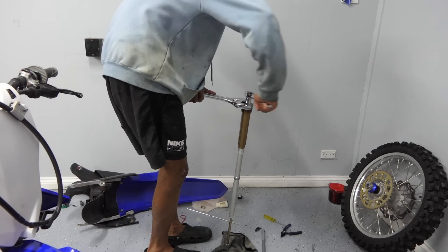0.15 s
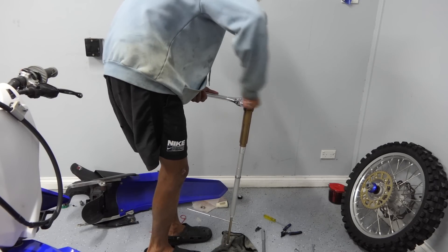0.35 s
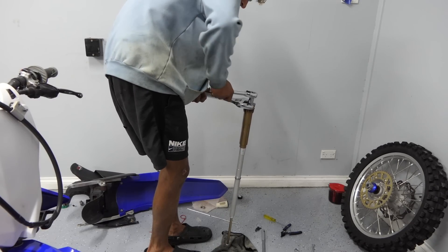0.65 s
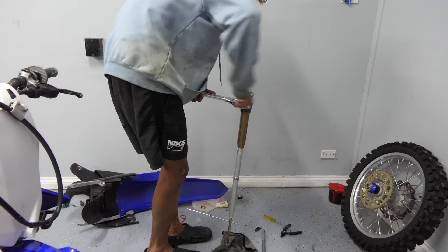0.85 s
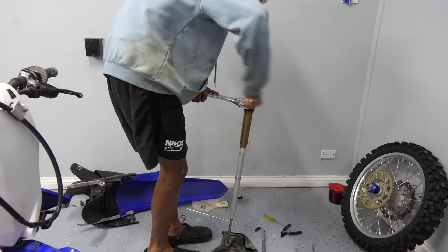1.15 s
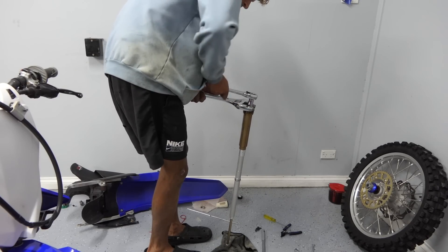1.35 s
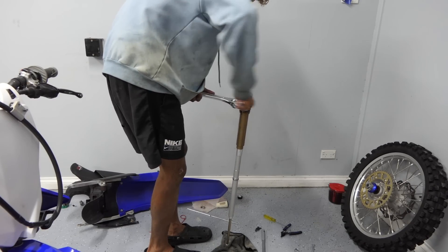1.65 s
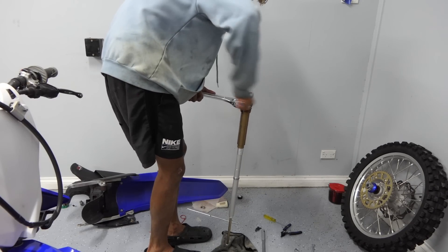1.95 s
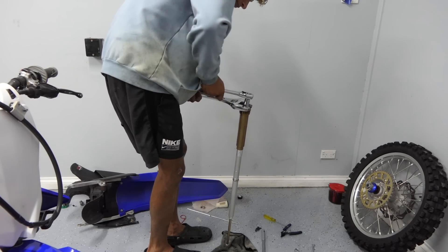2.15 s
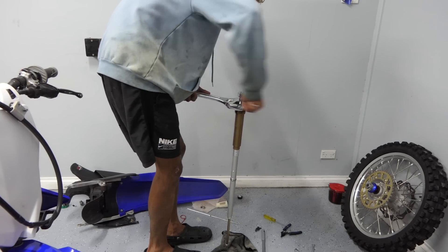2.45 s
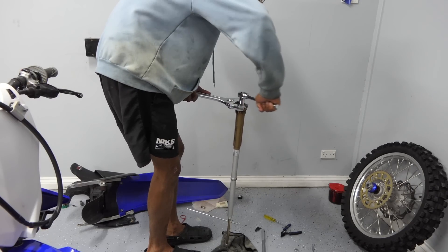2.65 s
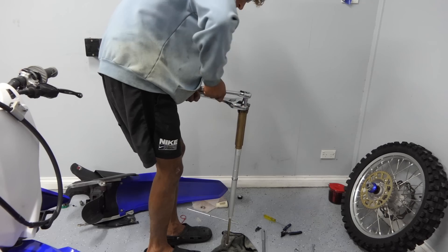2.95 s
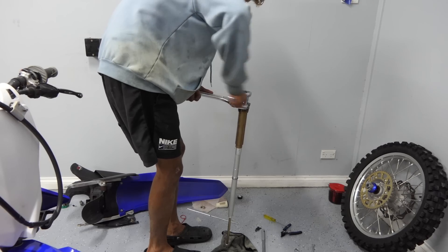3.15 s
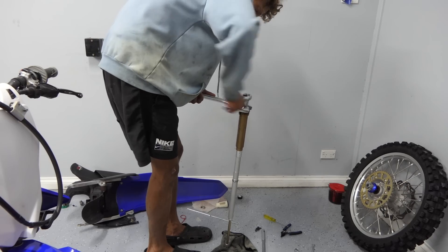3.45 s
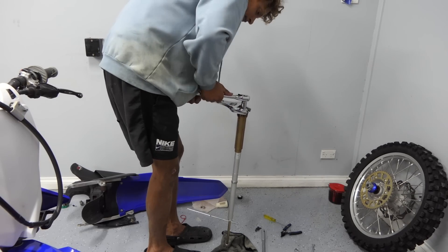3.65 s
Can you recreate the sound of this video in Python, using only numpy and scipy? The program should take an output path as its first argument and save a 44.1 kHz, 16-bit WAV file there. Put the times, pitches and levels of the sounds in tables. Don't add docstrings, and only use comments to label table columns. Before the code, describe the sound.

Ratchet handle swinging back five times, each a rapid bright clicking run, in a bare echoing room.

```python
import sys
import numpy as np
from scipy import signal
from scipy.fft import rfft, irfft, next_fast_len
from scipy.io import wavfile
from scipy.ndimage import map_coordinates

SR = 44100
rng = np.random.default_rng(int(sys.argv[2]) if len(sys.argv) > 2 else 0)


def gain_from_db(level_db):
    decades = np.asarray(level_db, float) / 20
    return 10 ** decades


def dump_mix(stems):
    frames = np.atleast_2d(stems).T
    limited = np.clip(frames, -1, 1)
    pcm = np.round(limited * 32767).astype(np.int16)
    wavfile.write(sys.argv[1], SR, pcm)


N = 167580


def unit(x):
    return x / np.sqrt(np.mean(x ** 2) + 1e-20)


def along(points, hz):
    f, v = np.transpose(points)
    return np.interp(np.log(hz + 1), np.log(f + 1), v)


def coloured(x, db_of_hz):
    n = x.shape[-1]
    m = next_fast_len(n + 4096)
    gain = gain_from_db(db_of_hz(np.fft.rfftfreq(m, 1 / SR)))
    cepstrum = irfft(np.log(gain + 1e-6), m)
    cepstrum[1:m // 2] *= 2
    cepstrum[m // 2 + 1:] = 0
    return irfft(rfft(x, m) * np.exp(rfft(cepstrum)), m)[..., :n]


def wobble(rate):
    return map_coordinates(rng.standard_normal(100), [np.arange(N) * rate / SR])


def add(track, s, sound):
    part = track[round(s * SR):][:len(sound)]
    part += sound[:len(part)]


def ratchet():
    # (time [s], teeth passed)
    angles = [
        [(.3485, 0), (.358, 1), (.3763, 3), (.3914, 4), (.4209, 7), (.452, 10), (.479, 12), (.5088, 14),
         (.5329, 15)],
        [(1.1507, 0), (1.181, 3), (1.2288, 8), (1.251, 10), (1.275, 12), (1.290, 13), (1.3085, 14),
         (1.3348, 15)],
        [(1.9394, 0), (1.954, 1), (1.9903, 5), (2.0112, 7), (2.0223, 8), (2.035, 9), (2.0725, 12), (2.0907, 13),
         (2.112, 14)],
        [(2.7352, 0), (2.7577, 2), (2.7998, 6), (2.8501, 11), (2.873, 13), (2.8876, 14), (2.904, 15),
         (2.9249, 16), (2.9506, 17)],
        [(3.2996, 0), (3.3162, 1), (3.3537, 4), (3.4051, 9), (3.4461, 13), (3.5192, 20), (3.562, 23),
         (3.584, 24), (3.615, 25)],
    ]
    pawl_db = [
        [-21, -20.5, -18, -17.5, -19.5, -20, -19.5, -17, -22.5],
        [-16.5, -18.5, -20.5, -19.5, -18, -20.5, -18, -20.5],
        [-18.5, -20.5, -19, -16, -25, -16, -21.5, -18.5, -26],
        [-20, -19.5, -17, -20.5, -21, -16.5, -23, -15.5, -21],
        [-20.5, -21.5, -21, -21.5, -20.5, -20.5, -16.5, -27, -26.5],
    ]
    grip_pitch = [(0.92, .995, 1.004, 1.001, 1.008, 1.003), (1.022, 1, .997, 1.001, .997, .998),
                  (1.05, .99, .998, .99, .99, 1.4), (0.974, .99, .995, .99, .99, 1.2),
                  (1.01, 1.026, 1.001, 1.001, .999, .99)]
    grip_db = [(-3, -1.5, 0.3, -1.5, -2, -3), (-7, -5, -2.5, 1, -0.8, -4.5), (-30, -3, -2.5, -4, 0, -5),
               (7.8, -3, -1.5, 1.5, -3.5, -7), (-3.5, 0.5, 1.3, 3, 2, -2)]
    turn_db = [(.3, -3.5, 6, -8, 6, .3), (.3, 1, 7.5, -5, 2, .3), (.3, 3.5, -.6, -3, -0.5, .3),
               (.3, -4, .3, -6, 1, .3), (2.5, -8, -7.5, -11, -3, .3)]
    # (start [dB], middle [dB], end [dB])
    facing_db = [(-14, -3, -9), (-10, -8, -3), (-17, -14, -8), (-19, -12, -2), (-5, -6, -5.5)]
    return sum(swing(*rows) for rows in zip(angles, pawl_db, grip_pitch, grip_db, turn_db, facing_db))


def swing(angles, pawl_db, grip_pitch, grip_db, turn_db, facing_db):
    # (frequency [Hz], level [dB], t60 [s])
    head = [(1350, -15, 0.018), (2290, -0.5, 0.0082), (2535, -8.5, 0.035), (3186, 6.5, 0.017),
            (3965, -5, 0.013), (5550, -9.5, 0.022), (6096, 8, 0.0058), (6270, 5.5, 0.018), (8680, 1, 0.011),
            (9100, -1.5, 0.026), (9807, 11, 0.0094), (10055, 5.5, 0.022), (11870, -4, 0.013),
            (11580, 8, 0.016)]
    # (frequency [Hz], level [dB])
    snap = [(300, -21), (700, -16), (1300, -8.5), (2500, -4.5), (4700, -8), (7500, -6), (11000, -6),
            (15500, -13.5)]
    # (frequency [Hz], level [dB])
    edge = [(4000, -40), (7500, -13), (11000, -7), (14000, -6), (16000, -9)]
    grip_hz = (1500, 3200, 6300, 9000, 10000, 12000)
    ring_db, ring_floor_hz, ring_attack_s = -11, 845, 0.00029
    snap_db, snap_t60, tick_db = 10.5, 0.01, -4.5
    mode_scatter_db, tooth_scatter_db, snap_scatter_db = 2, .5, 1
    detune, tooth_jitter_s = .007, .0003

    s, teeth = np.transpose(angles)
    tooth = np.arange(teeth[-1] + 1)
    progress = tooth / tooth[-1]
    t = np.arange(SR // 16) / SR
    mode_luck, pitch_luck = rng.standard_normal((2, len(tooth), len(head), 1))
    snap_luck, tooth_luck, time_luck = rng.standard_normal((3, len(tooth)))

    hz, mode_db, t60 = np.transpose(head)[..., None]
    hz = hz * np.interp(hz, grip_hz, grip_pitch)
    mode_db = mode_db + np.interp(hz, grip_hz, grip_db)
    mode_db = mode_db + np.interp(hz, grip_hz, turn_db) * (progress - .5)[:, None, None]
    decay = gain_from_db(mode_db + mode_scatter_db * mode_luck - 60 * t / t60)
    modes = decay * np.sin(2 * np.pi * hz * (1 + detune * pitch_luck) * t)
    ring = gain_from_db(ring_db) * modes.sum(1) * (1 - np.exp(-t / ring_attack_s))

    chatter = gain_from_db(-60 * t / snap_t60) * rng.standard_normal((len(tooth), len(t)))
    chatter = chatter / np.linalg.norm(chatter, axis=1)[:, None]
    snap_gain = 3 * gain_from_db(snap_db + snap_scatter_db * snap_luck)[:, None]
    crack = snap_gain * (chatter + gain_from_db(tick_db) * (t == 0))

    no_bass = lambda f: -10 * np.log10(1 + (ring_floor_hz / (f + 1)) ** 8)
    clicks = coloured(ring, no_bass) + coloured(crack, lambda f: along(snap, f))
    facing = gain_from_db(np.interp(progress, (0, .5, 1), facing_db))[:, None]
    clicks = clicks + facing * coloured(crack, lambda f: along(edge, f))
    strength_db = np.interp(tooth, teeth, pawl_db) + tooth_scatter_db * tooth_luck
    times = np.interp(tooth, teeth, s) + tooth_jitter_s * time_luck
    return workshop(times, clicks * gain_from_db(strength_db)[:, None])


def knocks():
    knock_s = [.2877, .62, 1.0824, 1.1095, 1.122, 1.415, 1.821, 1.8816, 2.205, 2.632, 2.6684, 3.0325, 3.233,
               3.265, 3.7105, 3.7172, 3.0326]
    # (level [dB], centre [Hz], spread [octaves], rattle length [s])
    landings = [(-19, 3100, 2, 0.0054), (-33.5, 4200, 1.9, 0.0045), (-30, 2300, 1.36, 0.0027),
                (-31, 2700, 3.3, 0.0042), (-37, 2000, 3, 0.0036), (-31.5, 5000, 2.5, 0.0078),
                (-47, 3000, 0.85, 0.0079), (-29, 2600, 2.7, 0.0047), (-35.5, 2200, 2.8, 0.018),
                (-51.5, 2300, 1.3, 0.0045), (-34.5, 5700, 3.1, 0.0089), (-22, 3500, 4.3, 0.0013),
                (-41, 1900, 1.2, 0.005), (-43.5, 1900, 1.3, 0.009), (-28, 1700, 3.9, 0.004),
                (-28.5, 9000, 2.7, 0.0015), (-7, 13600, 0.43, .0005)]
    # (rod [Hz], rod [dB], socket [Hz], socket [dB])
    knock_ring = [(1940, -38, 5070, -26), (1390, -56, 3500, -54), (1530, -56, 3450, -46),
                  (1510, -47, 3260, -47), (1460, -50, 3210, -57), (1390, -46, 1800, -48),
                  (1400, -51, 3200, -60), (1330, -29, 4700, -50), (1380, -36, 9600, -53),
                  (1400, -59, 3000, -60), (1480, -28.5, 3330, -28.5), (1400, -32, 3400, -28),
                  (1340, -42, 2800, -53), (1400, -59, 1300, -59), (1390, -52, 2500, -28),
                  (2230, -48, 4600, -49), (9100, -49, 9400, -41)]
    # (frequency [Hz], level [dB])
    slack = [(250, -23), (700, -4), (1350, 2.5), (2300, 2), (3300, -1), (5200, -5), (8200, -5),
             (11000, -13.5)]
    rattle_per_s, rattle_db = 1070, 2
    strike_db = -4
    ring_t60, ring_attack_s = (.016, .013), .0004

    t, sounds = np.arange(SR // 16) / SR, []
    for (db, centre_hz, octaves, length), ring in zip(landings, knock_ring):
        lumps = np.interp(t * rattle_per_s, np.arange(400), rng.standard_normal(400))
        rattle = gain_from_db(rattle_db * lumps) * np.exp(-(t / length) ** 2) * rng.standard_normal(len(t))
        rattle = rattle / np.linalg.norm(rattle) + gain_from_db(strike_db) * (t == 0)
        rattle = np.sqrt(SR * length) * rattle
        tone = lambda f: along(slack, f) - 6 * (np.log2((f + 1) / centre_hz) / octaves) ** 2
        modes = np.zeros(len(t))
        for hz, ring_db, t60 in zip(ring[::2], ring[1::2], ring_t60):
            modes += gain_from_db(ring_db - 60 * t / t60) * np.sin(2 * np.pi * hz * t)
        sounds.append(gain_from_db(db) * coloured(rattle, tone) + modes * (1 - np.exp(-t / ring_attack_s)))
    return workshop(knock_s, np.array(sounds))


def thumps():
    # (time [s], level [dB], frequency [Hz], t60 [s])
    jolts = [
        (0.291, -46.5, 142, 0.057),
        (.289, -33, 700, 0.023),
    ]
    t = np.arange(SR // 4) / SR
    sounds = [gain_from_db(db - 60 * t / t60) * np.sin(2 * np.pi * hz * t) for s, db, hz, t60 in jolts]
    return workshop([row[0] for row in jolts], np.array(sounds))


def sleeve():
    # (time [s], level [dB], length [s])
    brushes = [
        (0.156, -62, 0.054),
        (0.95, -63, 0.052),
        (1.76, -61, 0.045),
        (2.502, -60.5, 0.062),
    ]
    # (frequency [Hz], level [dB per Hz])
    cloth = [(1500, -16), (4000, -5), (7500, 0), (12000, -4), (16000, -16)]
    t = np.arange(N) / SR
    swell = sum(gain_from_db(db) * np.exp(-((t - s) / length) ** 2) for s, db, length in brushes)
    rustle = unit(coloured(rng.standard_normal(N), lambda f: along(cloth, f)))
    return swell * gain_from_db(1.2 * wobble(22.84)) * rustle


def workshop(times, sounds):
    # (delay [s], level [dB])
    bounces = [
        (.0036, -5),
        (.0066, -6),
        (0.0114, -12),
    ]
    # (frequency [Hz], level [dB])
    early_colour = [(1500, 0), (6000, -2), (14000, -6)]
    # (frequency [Hz], t60 [s])
    room = [(300, 1), (1300, 0.67), (3500, 0.66), (9000, .5), (15000, 0.27)]
    # (frequency [Hz], level [dB])
    room_colour = [(300, 1.5), (1500, 1), (5000, 1), (15000, -1)]
    early_db, early_t60, late_db, wall_gap_s = -1, 0.081, 2, .0028

    gap, dry, out = round(wall_gap_s * SR), np.zeros(N), np.zeros((2, N))
    fade = gain_from_db(-60 * np.arange(SR // 8) / SR / early_t60)
    early = rng.standard_normal((2, len(times), SR // 8)) * fade
    early = coloured(early, lambda f: along(early_colour, f))
    early = gain_from_db(early_db) * early / np.linalg.norm(early, axis=2, keepdims=True)
    early = np.pad(early, ((0, 0), (0, 0), (gap, 0)))
    early[0, :, 0] = 1
    for delay, db in bounces:
        early[0, :, round(delay * SR)] += gain_from_db(db)
    near = signal.fftconvolve(sounds[None], early, axes=2)
    for s, sound, mid, side in zip(times, sounds, *near):
        add(dry, s + wall_gap_s, sound)
        add(out[0], s, mid)
        add(out[1], s, side)

    hz, t, z = signal.stft(rng.standard_normal((2, SR)), SR, nperseg=256)
    tail_db = along(room_colour, hz)[:, None] - 60 * t / along(room, hz)[:, None]
    late = signal.istft(z * gain_from_db(tail_db), SR, nperseg=256)[1][:, :SR]
    late = gain_from_db(late_db) * late / np.linalg.norm(late[0])
    return out + signal.fftconvolve(dry[None], late, axes=1)[:, :N]


def room_tone():
    # (frequency [Hz], level [dB per Hz])
    air = [(13, -19), (22, -27), (55, -6.5), (118, -12), (199, -10.5), (298, -6.5), (470, -4), (600, -11.5),
           (850, -18), (1500, -40), (4000, -57)]
    # (frequency [Hz], level [dB per Hz])
    hiss = [(350, -26), (680, -15.5), (1130, -16), (2500, -21.5), (4500, -26.5), (7500, -24.5),
            (12500, -28), (16000, -33)]
    # (frequency [Hz], level [dB rms])
    hum = [(59.2, -71), (100, -73), (199.2, -64.5), (301.5, -63.5)]
    air_db, hiss_db, hum_waver_db, hum_drift_rad = -53.5, -58, -1.5, 1

    def noise(points):
        return np.array([unit(coloured(rng.standard_normal(N), lambda f: along(points, f))) for _ in "ms"])

    t = np.arange(N) / SR
    bed = gain_from_db(air_db + 0.067 * wobble(4.9)) * noise(air) + gain_from_db(hiss_db) * noise(hiss)
    for hz, db in hum:
        level = np.sqrt(2) * gain_from_db(db + hum_waver_db * wobble(6.5))
        bed[0] += level * np.sin(2 * np.pi * hz * t + hum_drift_rad * wobble(10.0))
    return bed


def scene():
    # (frequency [Hz], level [dB])
    side_db = [(60, -9.5), (300, -24.5), (800, -23.5), (1600, -30), (5000, -29.5), (14000, -24)]
    mid, side = ratchet() + knocks() + thumps() + room_tone()
    side = coloured(side, lambda f: along(side_db, f))
    mid = mid + sleeve()
    return np.array([mid + side, mid - side])


def top_cut(x):
    return signal.sosfilt(signal.butter(12, 16990, fs=SR, output="sos"), x)


def record(dry):
    ceiling, knee = .5, 3
    top_hz, edge_hz = 15750, 120
    soft = dry / (1 + np.abs(dry / ceiling) ** knee) ** (1 / knee)
    band = np.clip((top_hz - np.fft.rfftfreq(N, 1 / SR)) / edge_hz + 1, 0, 1) ** 2
    mix = irfft(rfft(soft) * band, N)
    return top_cut(mix)


dry = scene()
out = record(dry)
dump_mix(out)
```